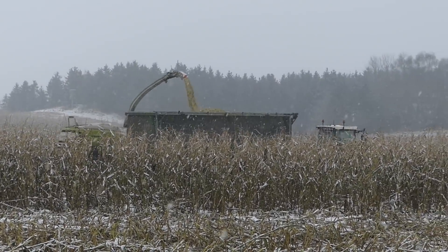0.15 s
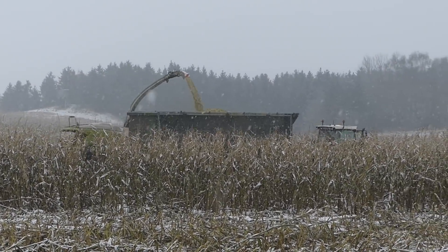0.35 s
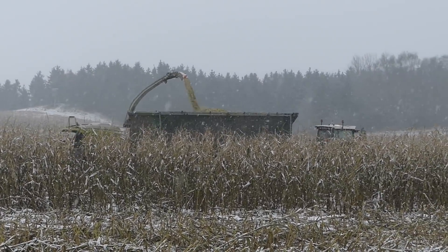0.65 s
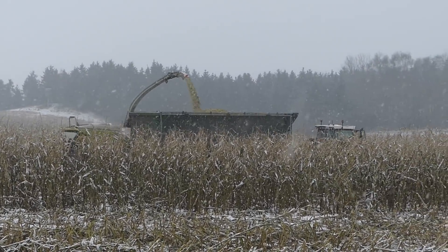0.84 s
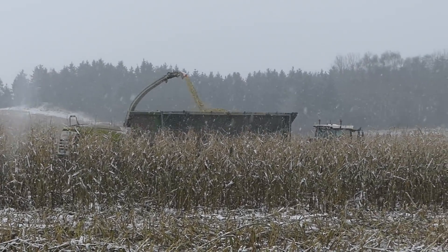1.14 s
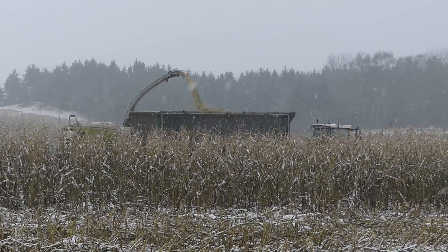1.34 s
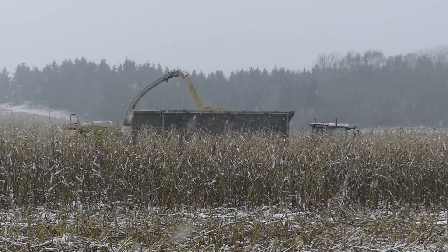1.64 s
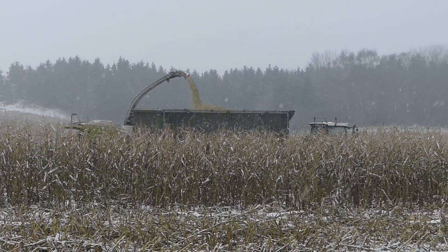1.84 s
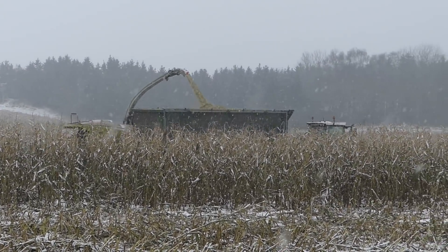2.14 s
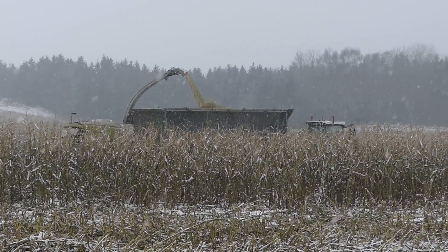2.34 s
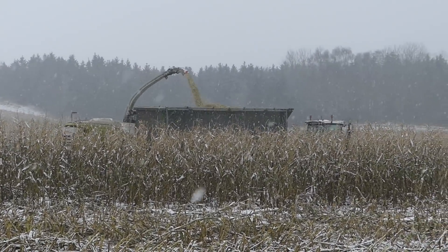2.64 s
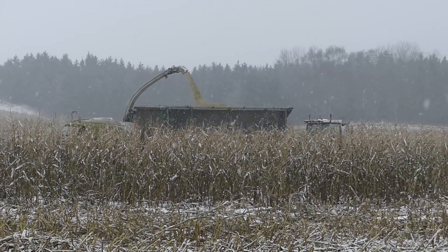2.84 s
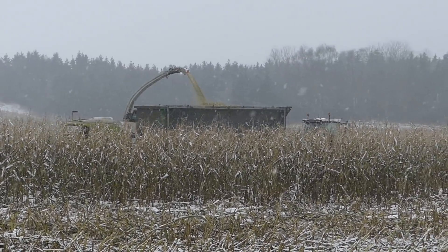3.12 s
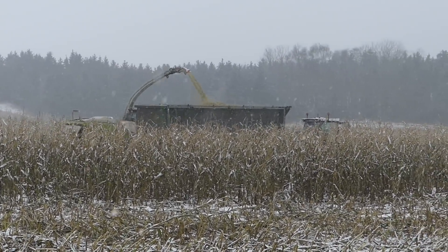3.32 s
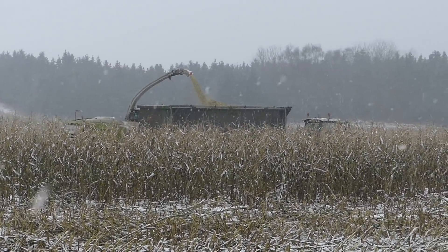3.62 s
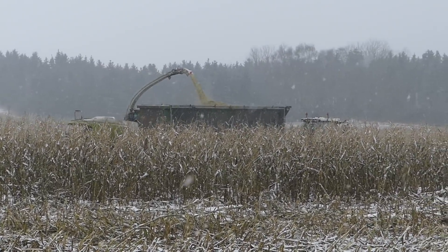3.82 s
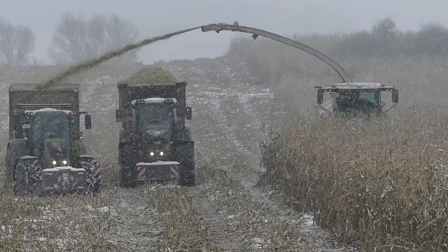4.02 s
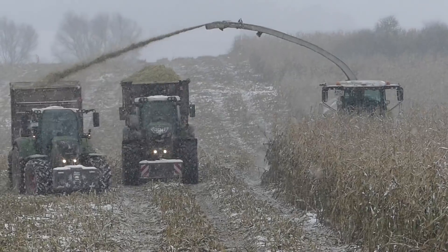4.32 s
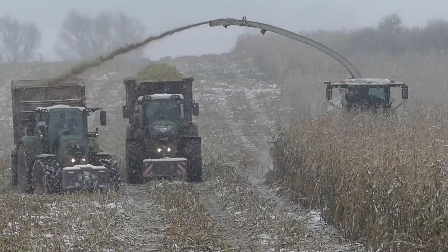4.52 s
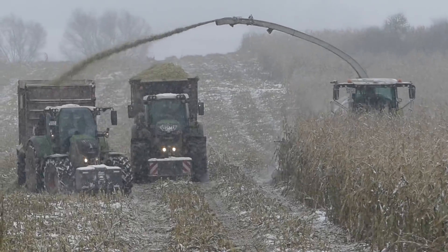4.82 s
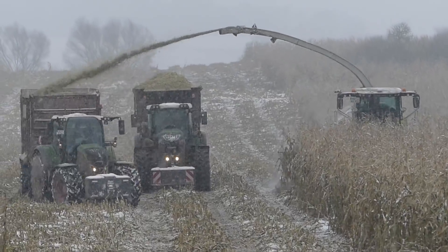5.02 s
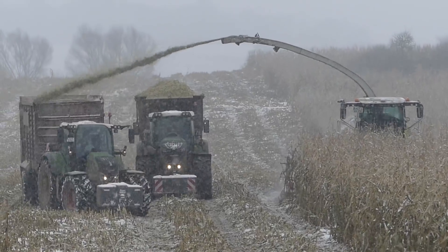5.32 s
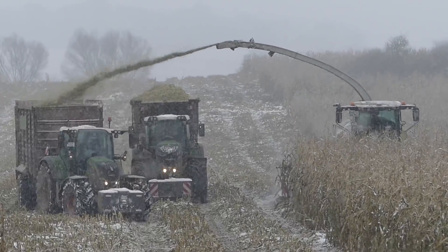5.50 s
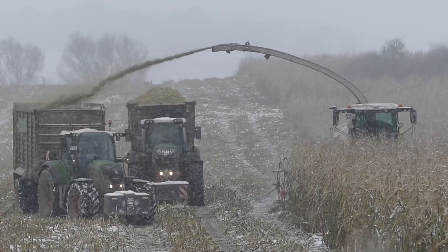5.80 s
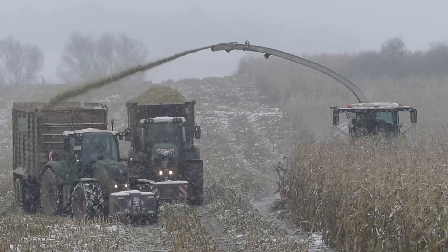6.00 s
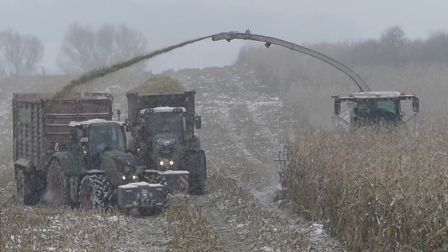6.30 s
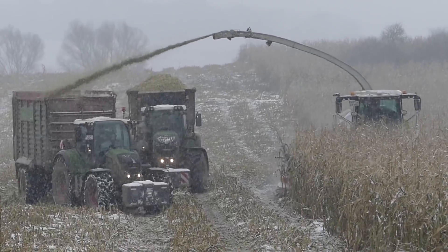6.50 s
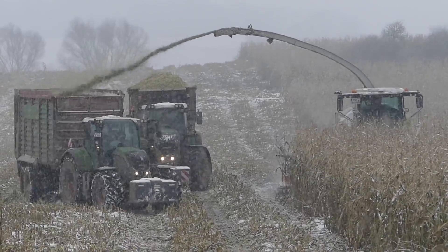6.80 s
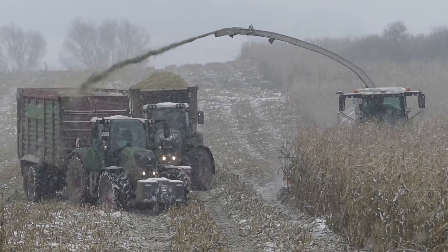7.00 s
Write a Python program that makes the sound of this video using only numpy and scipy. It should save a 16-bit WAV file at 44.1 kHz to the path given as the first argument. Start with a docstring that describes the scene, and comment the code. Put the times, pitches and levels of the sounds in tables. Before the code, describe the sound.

A steady diesel roar and blower hum across a field cuts to silence, then resumes slightly quieter with whining knives and crunching dry stalks.

```python
"""First comes a far-off roar and diesel drone: a forage harvester chopping maize, heard side-on.
After a short silence we hear it head-on, with dry stalks rustling, crunching and snapping.
The roar is noise whose spectrum drifts; the engines and whining shafts are wavering sine tones;
the stalks are clicks ringing in resonances. The sound is nearly mono, with a little stereo width."""
import sys
import numpy as np
from scipy import signal
from scipy.fft import rfft, irfft
from scipy.io import wavfile
from scipy.ndimage import uniform_filter1d

SR = 44100
rng = np.random.default_rng(int(sys.argv[2]) if len(sys.argv) > 2 else 0)


def generate_wav(sig):
    """Save sig (samples, or channels by samples) to the path in sys.argv[1] as 16-bit PCM at SR."""
    pcm = np.round(np.clip(np.atleast_2d(sig).T, -1, 1) * 32767).astype(np.int16)
    wavfile.write(sys.argv[1], SR, pcm)


N = 315315

SIDE_ENDS_S, FRONT_STARTS_S = 4.0233, 4.3646  # silence in between

# Engine tones that glide slowly. Each row: first and last pitch in Hz, first and last level in dB.
DRONE_SIDE_TONES = [(43.4, 40, -47.5, -43), (66.5, 63, -54.5, -40.5), (79.2, 80.2, -38.5, -39),
                    (106.8, 114, -38, -30.5), (125.9, 127, -29, -28), (135.9, 136.2, -34, -29),
                    (146.6, 144, -34, -33), (161.5, 160, -46, -46), (173.2, 176, -45, -39),
                    (192.6, 192, -52, -43), (354, 361, -46.5, -40.5)]
DRONE_FRONT_TONES = [(60.2, 61, -50.5, -40), (89.3, 88.3, -34, -39.5), (99, 101, -33, -45.5),
                     (121.2, 117, -30, -31), (135.3, 132.6, -40, -34.5), (146, 140, -39, -40),
                     (161, 158, -37.5, -35), (172.8, 176, -47, -52), (200, 220, -45, -44.5),
                     (295.5, 297.5, -44.5, -46), (405, 399, -42, -42.5)]

# The blower picks up, sags under load and recovers. Each row: time in seconds, blade rate in Hz.
BLOWER_SPEED = [(0.1, 313.3), (0.4, 318.5), (0.8, 325), (1.3, 324.3), (1.45, 322.2), (1.75, 323.8),
                (2.1, 319.4), (2.85, 325), (3.3, 322.3), (3.7, 322), (4.02, 318.5)]
BLOWER_DB, TURBO_DB = -31.5, -64
GEAR_RATIO = 11.62  # gear teeth passing for each blower blade
# The gear whine comes and goes. Each row: time in seconds, level in dB.
GEAR_LEVEL = [(0, -51), (.36, -51), (.43, -41.5), (.62, -38.5), (.8, -52), (1.17, -52), (1.26, -42),
              (1.62, -46.5), (2.0, -40.5), (2.17, -49), (2.32, -44), (3.03, -43), (3.12, -53.5),
              (3.22, -40), (3.42, -46.5), (3.62, -39), (4.0, -40.5)]
# The turbo whistle sinks as the load eases. Each row: time in seconds, pitch in Hz.
TURBO_PITCH = [(0.0, 11230), (0.55, 11480), (0.9, 11410), (1.45, 11110), (2.0, 11020), (2.4, 11080),
               (2.8, 11010), (3.05, 10770), (3.45, 10850), (3.65, 10770), (4.0, 10790)]
# A pump that fades away. Each row: time in seconds, pitch in Hz, level in dB of the pitch and of its double.
PUMP_WHINE = [(4.37, 351, -54, -29), (4.5, 353, -46, -31), (4.65, 344, -34.5, -26), (4.8, 350.5, -34, -36),
              (5.0, 350, -46, -37), (5.3, 353, -54, -55), (5.6, 350, -56, -60)]
# Cutter drum. Each row: time in seconds, knife rate in Hz, levels in dB of its first three multiples.
KNIFE_WHINE = [(4.37, 335.9, -54, -35, -36), (4.8, 335.5, -60, -48, -37), (5.0, 336.5, -56, -28.5, -30.5),
               (5.6, 335.4, -47, -28, -35), (6.0, 337.6, -37, -28, -35), (6.4, 336.2, -38.5, -31.5, -34),
               (6.7, 331.5, -50, -31, -38), (7.15, 333, -38, -39, -42)]

# Ringing of the dry stalks. Each row: pitch in Hz, width in Hz, level in dB.
LOW_STALK_RINGS = [(2815, 1020, -3), (3525, 930, -23), (4510, 670, -14.5)]
HIGH_STALK_RINGS = [(6160, 1300, -20.5), (7380, 800, -25.5), (8800, 1100, -31)]
# Armfuls of stalks dragged into the header. Each row: peak time in seconds, peak in dB, length in seconds.
STALK_ARMFULS = [(4.38, -52, 0.038), (4.59, -47, 0.084), (4.758, -34.5, 0.067), (4.846, -36, 0.15),
                 (5.064, -40, .05), (5.2, -43, 0.18), (5.345, -37, 0.12), (5.596, -36.5, 0.13),
                 (5.78, -36, 0.093), (5.89, -35, .07), (5.975, -36, 0.055), (6.194, -36, .05),
                 (6.27, -40, .07), (6.352, -35, 0.15), (6.478, -37, .12), (6.58, -34, 0.062),
                 (6.91, -39, .1), (7.14, -37, 0.073)]
RUSTLE_DB, HIGH_RINGS_LIFT_DB = -37, 1.5  # steady rustle between armfuls; lift of the upper rings
RISE_SHARE = 0.45  # a bunch of stalks swells faster than it dies
# Single stalks snapping. Each row: start in seconds, relative strength in dB, pitch in Hz.
STALK_SNAPS = [(4.9294, -28, 2700), (5.1193, -31, 2596), (5.2883, -29, 2980), (5.5884, -25, 2920),
               (5.8753, -26, 3521), (6.5206, -27, 2650), (6.8478, -25, 3007), (6.887, -14, 3010)]
# Breaking stalks. Each row: middle in seconds, level in dB, pitch in Hz, width in Hz, length in seconds.
STALK_CRUNCHES = [(4.76, -50, 6000, 2500, .03), (4.856, -41, 4600, 500, .04), (5.78, -33, 3000, 900, 0.037),
                  (5.878, -32.5, 3540, 500, .012), (5.91, -42, 4700, 900, .015),
                  (6.192, -47, 6500, 3015, .03), (6.357, -35, 3100, 900, .02),
                  (6.365, -33, 4100, 1300, 0.04), (6.585, -43, 2900, 600, .03),
                  (6.592, -39, 4600, 900, .04)]

# Roar of engines, cutter and crop; the dip near 260 Hz is the ground echo.
# Each row: frequency in Hz, relative strength in dB per Hz.
ROAR_SIDE_COLOUR = [(20, -29), (60, -12), (125, -7), (190, -10.5), (260, -21.5), (350, -10), (750, -1),
                    (1200, -7.5), (2000, -15), (3200, -19.5), (5000, -31.5), (7500, -36.5), (10000, -47),
                    (15500, -61.5)]
ROAR_FRONT_COLOUR = [(20, -24.5), (60, -10.5), (120, -2.5), (200, -6), (275, -23), (350, -15), (520, -13),
                     (720, -8), (1500, -7), (2100, -21.5), (4000, -32.5), (7500, -49), (10000, -53),
                     (15500, -54.5)]
# Panels and spout that colour the roar. Each row: frequency in Hz, width in Hz, boost or cut in dB.
SIDE_PANELS = [(759, 54, 3.5), (857, 9, 9), (1154, 220, 5), (3170, 150, 1), (2470, 100, -6.5),
               (3290, 150, -0.5), (6900, 300, -4), (8520, 520, -7.5), (12500, 2500, -4.5)]
FRONT_PANELS = [(696, 62, 3.2), (355, 47, 4.3), (1022, 60, 2.1), (1490, 150, 1.9)]
# Load on the machines. Each row: time in seconds, roar level in dB, lift of the rustling treble in dB.
SIDE_LOAD = [(0.0, -16, -0.5), (1.17, -16, 1.5), (1.671, -18, 2.2), (2.1, -16, 1), (2.3, -18, 0),
             (2.6, -17, 0.5), (3.05, -17.5, 1), (3.16, -19.5, 0.5), (3.28, -17, -4), (3.68, -17, -1.5),
             (4.02, -17.5, 1.5)]
FRONT_LOAD = [(4.37, -21, 0), (4.86, -21, 0), (5.68, -21, 0.0012), (6.33, -20, 0), (7.15, -20, 0)]
RUMBLE_SIDE_DB, RUMBLE_FRONT_DB = 0.8, 1.7  # lift of the roar's bass

# How much left and right differ. Each row: frequency in Hz, left-minus-right below the sum in dB.
STEREO_WIDTH = [(60, -31), (120, -42), (240, -34), (480, -33), (950, -38), (1890, -27), (3770, -20),
                (7520, -15), (15000, -13)]
DIP_HZ = 8100  # centre of a narrow treble dip
NOTCH_HZ, EDGE_HZ = 5932, 15700  # microphone notch; upper limit of the sound


def gain_of(db):
    """Turns decibels into amplitude."""
    return 10 ** (np.asarray(db) / 20)


def evened(x):
    """Scales a signal to an rms of one."""
    return x / np.sqrt(np.mean(x ** 2) + 1e-20)


def read(points, hz):
    """Reads a spectrum table, joining its points by straight lines over log frequency."""
    f, value = np.transpose(points)
    return np.interp(np.log(hz + 1), np.log(f + 1), value)


def curves(rows, t):
    """Reads each column of a table at the times t."""
    s, *columns = np.transpose(rows)
    return [np.interp(t, s, column) for column in columns]


def drift(top_hz):
    """Slow random wandering of rms one: noise that gets weaker and weaker above top_hz."""
    spectrum = rfft(rng.standard_normal(N))
    hz = np.fft.rfftfreq(N, 1 / SR)
    return evened(irfft(spectrum / (1 + (hz / top_hz) ** 2), N))


def tone(hz, db, waver_db, waver_hz, blur_rad):
    """A sine whose level and phase shimmer as it crosses turbulent air."""
    phase = 2 * np.pi * np.cumsum(hz * np.ones(N)) / SR
    phase += 2 * np.pi * rng.random() + blur_rad * drift(waver_hz)
    level = gain_of(db + waver_db * drift(waver_hz))
    return np.sqrt(2) * level * np.sin(phase)  # root two: a sine's peak over its rms


def multiples(base_hz, levels_db, waver_db, waver_hz, blur_rad):
    """A turning part whines at its base pitch and at whole multiples of it."""
    return sum(tone(k * base_hz, db, waver_db, waver_hz, blur_rad) for k, db in enumerate(levels_db, 1))


def resonate(x, hz, width):
    """A steep resonance: the same ringing filter twice in a row."""
    b, a = signal.iirpeak(hz, hz / width, SR)
    once = signal.lfilter(b, a, x)
    return signal.lfilter(b, a, once)


def drone(tones, span, t, waver_db, waver_hz, blur_rad):
    """Several diesel engines hum together, their tones gliding across one view."""
    out = np.zeros(N)
    for row in tones:
        hz = np.interp(t, span, row[:2])
        db = np.interp(t, span, row[2:])
        out += tone(hz, db, waver_db, waver_hz, blur_rad)
    return out


def side_whines(t):
    """Blower blades hum, gear teeth whine in step with them, and a turbo whistles fuzzily."""
    blower_hz, = curves(BLOWER_SPEED, t)
    gear_db, = curves(GEAR_LEVEL, t)
    turbo_hz, = curves(TURBO_PITCH, t)
    blower = tone(blower_hz, BLOWER_DB, 0.6, 9.3, 0.25)
    gear = tone(GEAR_RATIO * blower_hz, gear_db, 2.8, 22.0, 0.25)
    turbo = tone(turbo_hz, TURBO_DB, 3.0, 50.0, 1.1)
    return blower + gear + turbo


def front_whines(t):
    """Passing knives whine at multiples of their rate, beside a pump that fades away."""
    knife_hz, *knife_db = curves(KNIFE_WHINE, t)
    pump_hz, *pump_db = curves(PUMP_WHINE, t)
    knives = multiples(knife_hz, knife_db, 1.9, 16.0, 0.4)
    pump = multiples(pump_hz, pump_db, 3.7, 22.0, 0.58)
    return knives + pump


def crunches(t):
    """Each crunch is a swarm of clicks in one resonance, swelling and dying fast."""
    out = np.zeros(N)
    age = t[:4096] - t[2048]
    for s, db, hz, width, length in STALK_CRUNCHES:
        swarm = rng.standard_normal(4096) * (rng.random(4096) < 0.08)
        burst = evened(resonate(swarm, hz, width)) * np.exp(-(2 * age / length) ** 2)
        out[round(s * SR) - 2048:][:4096] += gain_of(db) * burst
    return out


def snaps(t):
    """A breaking stalk gives a ring that dies within milliseconds, with a still shorter tick on top."""
    out = np.zeros(N)
    age = t[:300]
    tick = 0.8 * np.sin(2 * np.pi * 7600 * age) * np.exp(-age / 0.0001)
    for s, db, hz in STALK_SNAPS:
        ring = np.cos(2 * np.pi * hz * age) * np.exp(-age / 0.0008)
        out[round(s * SR):][:len(age)] += gain_of(db) * 0.54 * (ring + tick)
    return out


def ringing_stalks(grains, rings):
    """Dry stalks ring at several pitches when crackles strike them."""
    out = np.zeros(N)
    for hz, width, db in rings:
        clicks = grains * rng.choice([-1, 1], N)  # each click pushes or pulls
        out += gain_of(db) * evened(resonate(clicks, hz, width))
    return out


def rustle(t):
    """Dry leaves crackle densely and unevenly in the stalk rings, louder with each armful."""
    strength = gain_of(3.0 * np.minimum(rng.exponential(1, N), 5))
    grains = strength * (rng.random(N) < 5000 / SR)  # about 5000 crackles a second
    low = ringing_stalks(grains, LOW_STALK_RINGS)
    high = ringing_stalks(grains, HIGH_STALK_RINGS)
    loudness = gain_of(RUSTLE_DB) * np.ones(N)
    for s, db, length in STALK_ARMFULS:
        spread = np.where(t < s, RISE_SHARE * length, length)
        loudness += gain_of(db) * np.exp(-(2 * (t - s) / spread) ** 2)
    return loudness * (low + gain_of(HIGH_RINGS_LIFT_DB) * high)


def roar(colour, panels, load, rumble_db, patchy_db, lumpy_db):
    """Many noises blend into a coloured roar that drifts in patches and follows the machines' load."""
    load_s, level_db, bright_db = np.transpose(load)
    frames, hz = N // 512 + 5, np.fft.rfftfreq(2048, 1 / SR)
    a, b, patches, lumps = rng.standard_normal((frames, 1025, 4)).T
    # smooth over neighbouring frequencies, then over time
    patches = evened(uniform_filter1d(uniform_filter1d(patches, size=20, axis=0), size=6, axis=1))
    lumps = evened(uniform_filter1d(uniform_filter1d(lumps, size=12, axis=0), size=2, axis=1))  # crop clumps
    shape_db = read(colour, hz)
    for f, width, db in panels:
        shape_db = shape_db + db / (1 + (2 * (hz - f) / width) ** 2)
    shape = gain_of(shape_db)
    shape = shape / np.linalg.norm(shape[(hz > 400) & (hz < 2000)])  # the middle band sets the level
    treble = np.exp(-np.log2((hz + 1) / 6500) ** 2)[:, None]  # rustling band of the crop
    bass = (hz < 260)[:, None]
    t = np.arange(frames) * 512 / SR
    moving_db = np.interp(t, load_s, level_db) + treble * np.interp(t, load_s, bright_db) + bass * rumble_db
    moving_db = moving_db + patchy_db * patches + lumpy_db * lumps
    spectra = (a + 1j * b) * shape[:, None] * gain_of(moving_db)
    return signal.istft(spectra, nperseg=2048, noverlap=1536)[1][:N]


def side_on(t):
    """The far view: drone, whines and roar add up."""
    engines = drone(DRONE_SIDE_TONES, (0, SIDE_ENDS_S), t, 1.5, 3.9, 0.5)
    machines = roar(ROAR_SIDE_COLOUR, SIDE_PANELS, SIDE_LOAD, RUMBLE_SIDE_DB, 0.81, 0.84)
    return engines + side_whines(t) + machines


def head_on(t):
    """The front view: drone, whines, stalks and roar add up, with a treble dip."""
    engines = drone(DRONE_FRONT_TONES, (FRONT_STARTS_S, N / SR), t, 2.3, 7.8, 0.9)
    stalks = crunches(t) + rustle(t) + snaps(t)
    machines = roar(ROAR_FRONT_COLOUR, FRONT_PANELS, FRONT_LOAD, RUMBLE_FRONT_DB, 0.71, 1.5)
    direct = engines + front_whines(t) + stalks + machines
    dipped = signal.lfilter(*signal.iirnotch(DIP_HZ, 14.0, SR), direct)
    return 0.76 * dipped + 0.18 * direct  # the unfiltered share keeps the dip shallow


def late_side(mid):
    """A late copy of the sound for the stereo width, its strength varied at random."""
    late = np.roll(mid, 900)  # about 20 milliseconds
    width = gain_of(read(STEREO_WIDTH, np.fft.rfftfreq(N, 1 / SR)))
    strength = evened(gain_of(21.3 * np.tanh(3.7 * drift(12.3))))
    return irfft(rfft(late) * width, N) * strength


def scene():
    """Plays both views in turn and adds the late copy with opposite signs left and right."""
    t = np.arange(N) / SR
    mid = np.where(t < SIDE_ENDS_S, side_on(t), head_on(t))
    side = late_side(mid)
    return np.array([mid + side, mid - side])


def record(dry):
    """The microphone has a narrow notch; then come the silence between views and the treble limit."""
    t = np.arange(N) / SR
    notched = signal.lfilter(*signal.iirnotch(NOTCH_HZ, 60.0, SR), dry)
    cut = notched * ((t < SIDE_ENDS_S) | (t >= FRONT_STARTS_S))
    low_pass = signal.firwin(1023, EDGE_HZ, window=("kaiser", 9), fs=SR)
    return signal.oaconvolve(cut, low_pass[None], "same")


dry = scene()
out = record(dry)
generate_wav(out)
```